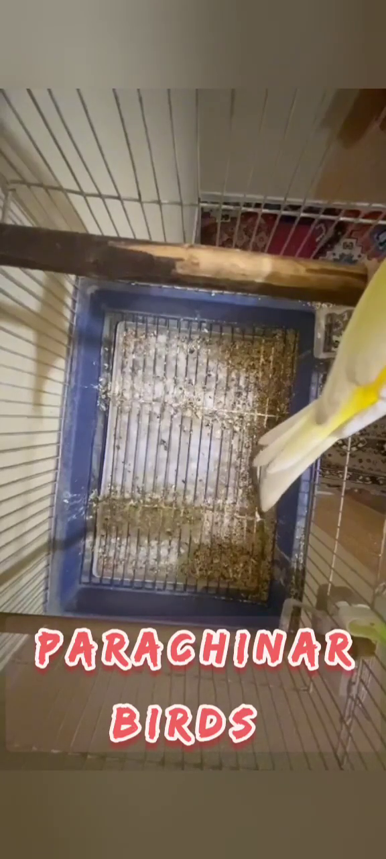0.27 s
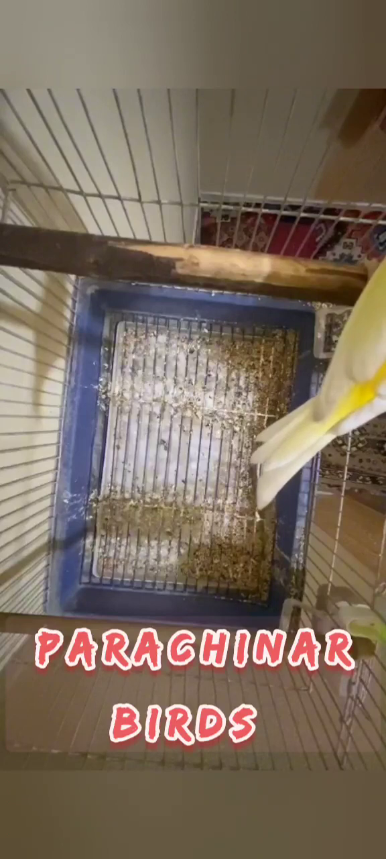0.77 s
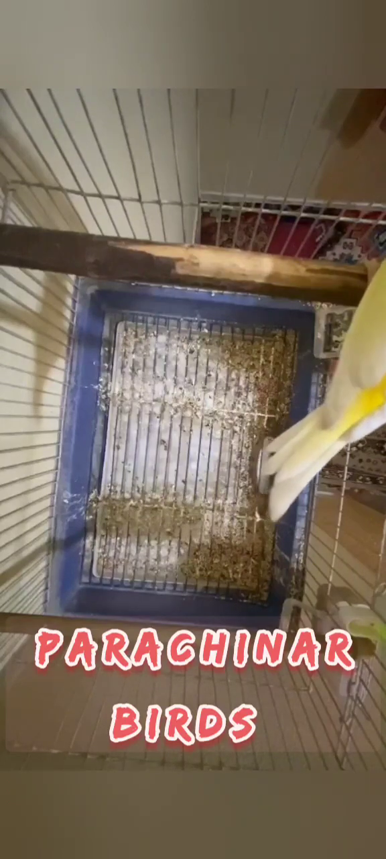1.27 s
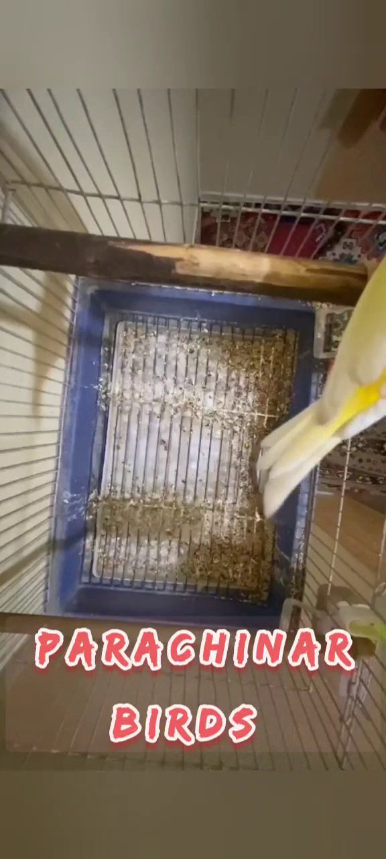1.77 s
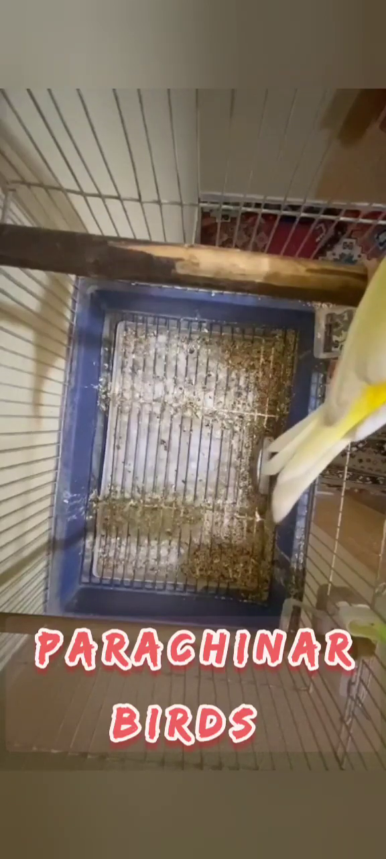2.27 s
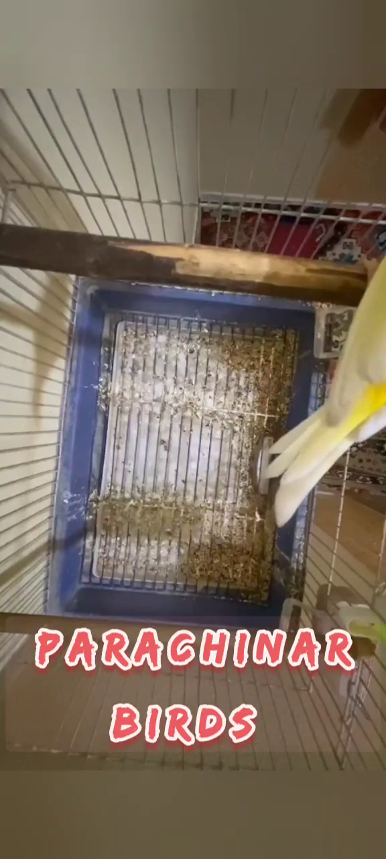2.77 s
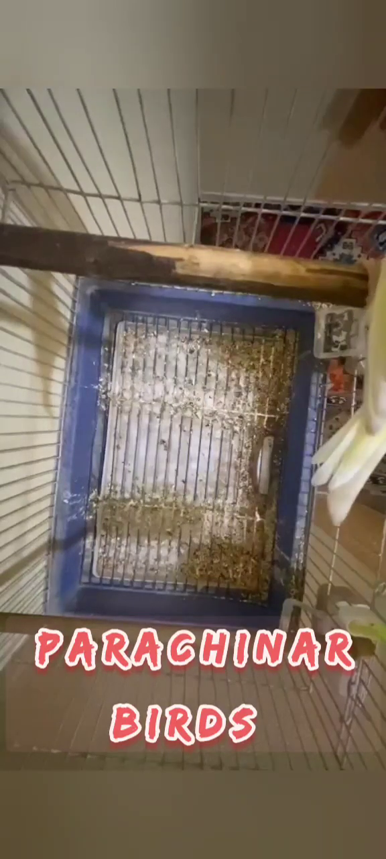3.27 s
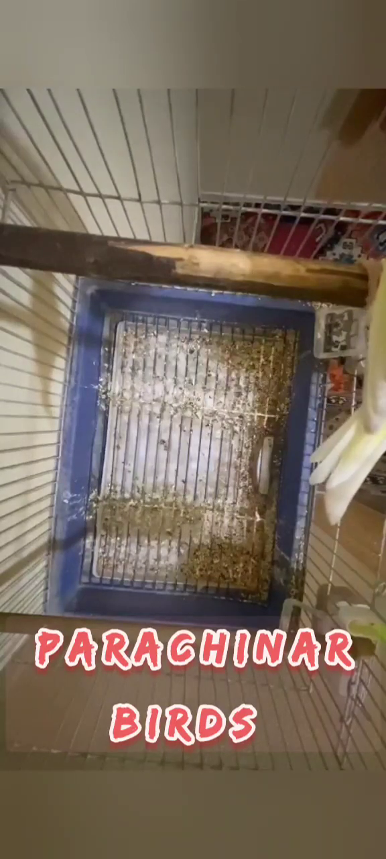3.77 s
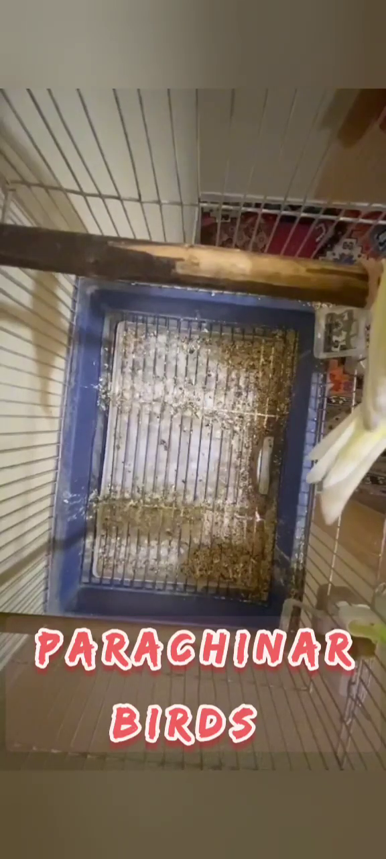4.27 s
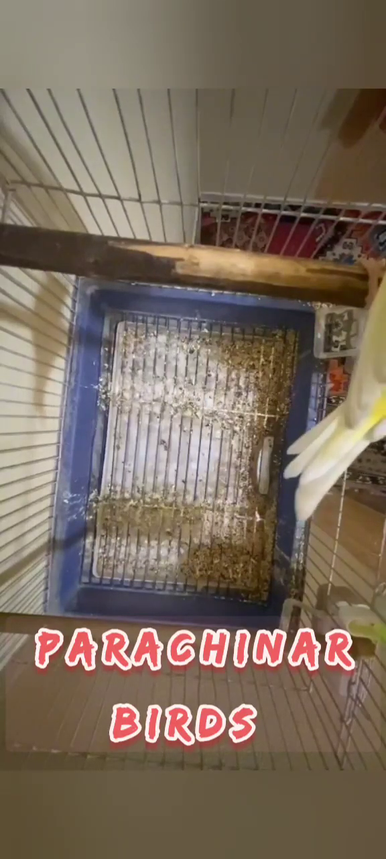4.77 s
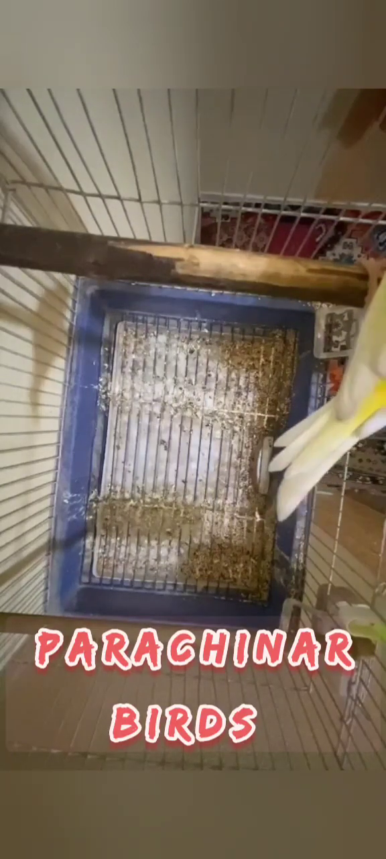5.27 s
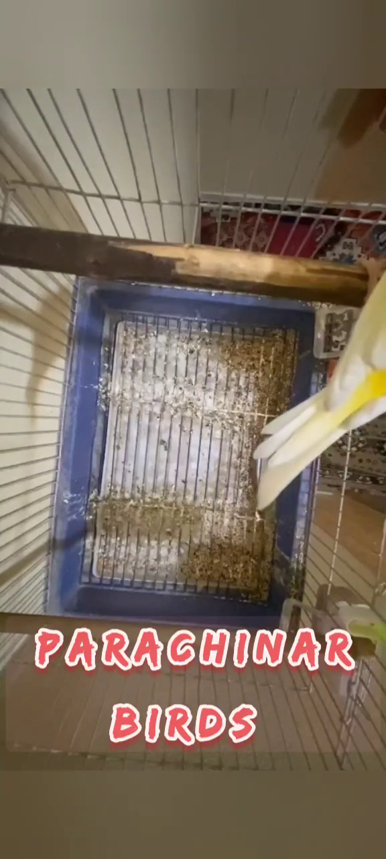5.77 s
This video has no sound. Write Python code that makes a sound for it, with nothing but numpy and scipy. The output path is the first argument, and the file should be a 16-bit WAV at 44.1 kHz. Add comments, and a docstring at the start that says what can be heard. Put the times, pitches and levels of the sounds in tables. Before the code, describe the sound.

A canary sings close to the microphone inside a wire cage in a lively room. From 0 to 1.6 seconds it gives four held whistles around 1100 Hz, the first already under way, each lifting and cracking slightly at the end. Sharp plunging chips with clicks separate them at about 0.34, 0.8 and 1.27. From 1.7 to 2.7 a trill of upward flicks runs at about seventeen beats a second, gaining strength and a nasal murmur. Feathers swish and the perch thuds near 2.7. Song then stops until 4.3, with low hum swelling and fading over a fuzzy drone and faint room air. At 4.3 and 4.9 airy swoops fall into clear tones, breaking into hoarse lower croaks with harsh endings. From 5.4 to 6 a faster trill of about twenty-three beats a second alternates clicking downward snaps and upward flicks. Walls and cage wires ring; slight shuffles recur.

```python
"""A caged canary sings close by: four held whistles with sharp chips between them, a trill,
two falling slurs that break into a hoarse lower octave, and a faster two-part trill.
Held notes are sums of harmonics with half-pitch lines; short ones are quick pitch sweeps and clicks.
Shaped noise makes its shuffles on the perch; walls answer with a fading noise tail, the cage with narrow rings.
A low hum swells and fades under it all, with a noise drone and faint room air."""
import sys
import numpy as np
from scipy import signal
from scipy.fft import rfft, irfft, next_fast_len
from scipy.io import wavfile
from scipy.ndimage import uniform_filter1d, map_coordinates

SR = 44100
rng = np.random.default_rng(int(sys.argv[2]) if len(sys.argv) > 2 else 0)


def put_to_file(sound):
    """Save the sound as 16-bit audio at rate SR, in the file named by the first command-line argument."""
    columns = np.atleast_2d(sound).T  # one column per channel
    safe = np.clip(columns, -1, 1)
    whole_steps = np.round(safe * 32767)
    wavfile.write(sys.argv[1], SR, whole_steps.astype(np.int16))


N = 265173  # length in samples

# The pulses of a click. Each row: delay in seconds, level in dB, random timing spread in seconds.
CLICK_PULSES = [(.001, 0, 0), (.0032, -2, .0004)]
TRILL_SCATTER = .015  # random pitch spread from beat to beat, as a fraction
FLICK_RAD = .2  # phase jitter of the slow trill's flicks and the fast trill's snaps, radians


def amp(db):
    """Decibels to gain."""
    return 10 ** (np.asarray(db) / 20)


def unit(x):
    """Scale to rms 1."""
    return x / np.sqrt(np.mean(x ** 2) + 1e-20)


def along(points, hz):
    """Rows of (Hz, value) read on a log frequency axis."""
    f, v = np.transpose(points)
    return np.interp(np.log(hz + 1), np.log(f + 1), v)


def curves(rows, t):
    """Each column after the time, read at times t."""
    s, *cols = np.transpose(rows)
    return [np.interp(t, s, c) for c in cols]


def wobble(rate, size):
    """A smooth random curve, rate knots a second."""
    knots = rng.standard_normal(int(size * rate / SR) + 4)
    return map_coordinates(knots, [np.arange(size) * rate / SR])


def filtered(x, response):
    """x times a response of frequency."""
    m = next_fast_len(N + SR // 2)
    return irfft(rfft(x, m) * response(np.fft.rfftfreq(m, 1 / SR)), m)[..., :N]


def noise(spectrum):
    """Coloured noise of rms 1."""
    return unit(filtered(rng.standard_normal(N), lambda hz: amp(along(spectrum, hz))))


def add(track, s, sound):
    """Mix a sound into the track from time s on."""
    i = round(s * SR)
    sound = sound[..., max(-i, 0):max(N - i, 0)]
    track[..., max(i, 0):max(i, 0) + sound.shape[-1]] += sound


def sides(db):
    """Left and right gains for a level difference."""
    return unit(amp(np.array([[1], [-1]]) * db / 2))


def step(t, s, width):
    """A smooth rise from 0 to 1 around time s."""
    return .5 + .5 * np.tanh((t - s) / (2 * width))


def fades(t, attack, release):
    """Attack, hold and release over the times t."""
    return np.clip(np.minimum((t - t[0]) / attack, (t[-1] - t) / release), 0, 1)


def smooth_size(x, size):
    """Running rms along the last axis."""
    return np.sqrt(np.abs(uniform_filter1d(np.abs(x) ** 2, size)) + 1e-20)


def syrinx(t, hz, harmonics_db, split, rasp, pan_db, bloom_db, bloom_s, half_lines=None):
    """A held tone; period doubling puts lines between its harmonics, and rasp doubles the period again."""
    # Strength of the upper harmonics. Each row: frequency in Hz, level in dB.
    overtones = [(4000, -14.5), (4600, -20.5), (5500, -14.5), (6600, -18), (7800, -29), (9000, -31),
                 (10200, -45.5), (11500, -52.5)]
    if half_lines is None:
        # Strength of the lines between the harmonics. Each row: frequency in Hz, level in dB.
        half_lines = [(550, -27), (820, -16.5), (1650, -5.5), (2500, -4.5), (2800, 6.5), (4000, -25.5),
                      (5800, -32.5), (7500, -35.5), (10000, -57)]
    pitch_waver, clear_rad = 0.0076, 0.025  # fraction of the pitch; phase jitter in radians
    flicker_db, sway_db = 1.2, 3  # low-harmonic level flicker, left-right sway
    size = len(t)
    phase = 2 * np.pi * np.cumsum(hz * (1 + pitch_waver * wobble(150, size))) / SR
    # the rasp combines a quarter and an eighth of the pitch, both drifting in phase
    rough = .22 * wobble(600, size)
    rough = rough + 1.1 * np.sin(phase / 4 + 1.1 * wobble(45, size))
    rough = rough + .35 * np.sin(phase / 8 + 1.5 * wobble(45, size))
    phase = phase + clear_rad * wobble(700, size) + rasp * rough
    low = [db + flicker_db * wobble(30, size) for db in harmonics_db]
    # the upper harmonics come in only as the pressure builds, and each one wavers
    bloom = bloom_db * np.exp(-(t - t[0]) / bloom_s)
    upper = [harmonics_db[-1] + bloom + along(overtones, k * hz) + 3.6 * wobble(40, size)
             for k in range(4, 11)]
    tone = sum(amp(level) * np.sin(k * phase) for k, level in enumerate(low + upper, 1))
    slip = .65 * wobble(70, size)  # the doubled period keeps losing its lock
    halves = sum(amp(along(half_lines, k * hz) + bloom * (k > 2)) * np.sin(k * phase + slip)
                 for k in np.arange(9) + .5)
    halves *= split * amp(2 * wobble(110, size))
    return sides(pan_db + sway_db * wobble(20.2, size)) * (tone + halves)


def whistles():
    """Each scoops up, then drifts (the first slowly up, the others down), brightens, cracks and lifts."""
    # Each row: start and end in seconds, pitch in Hz, downward drift in Hz per second (negative climbs),
    # closing lift in Hz, level in dB, 2nd harmonic in dB re level, time of the deepest crack in seconds,
    # its rasp depth, left-right in dB.
    whistle_rows = [(-.1, 0.286, 1108, -47.5, 40, -30.5, -6, 0.23, 0.09, 5.5),
                    (0.372, 0.733, 1107, 87.5, 88.4, -35.5, -6, 0.655, 0.24, 0.5),
                    (0.839, 1.194, 1117, 256.5, 105, -36, -8.5, 1.123, 0.083, -1),
                    (1.3, 1.626, 1115, 371, 52.5, -36, -7, 1.569, 0.26, -0.5)]
    scoop_hz, scoop_s, lift_lead_s, lift_s = 215.5, 0.022, .045, .011
    brighten_db, third_db = 3, -46.5  # overtone growth over the whistle, 3rd harmonic level
    crack_loss_db, crack_split_db, crack_s = 4, -42, .033  # lasting loss, half-pitch lines, crack width
    out = np.zeros((2, N))
    for start, end, pitch, drift, lift, db, second_db, crack_at, rasp, pan_db in whistle_rows:
        t = np.arange(start, end, 1 / SR)
        age = t - start
        cracked = np.exp(-((t - crack_at) / crack_s) ** 2)
        hz = pitch - scoop_hz * np.exp(-age / scoop_s) - drift * age
        hz = hz + lift * step(t, end - lift_lead_s, lift_s)
        bright = brighten_db * (age / (end - start) - .5)
        loss = crack_loss_db * step(t, crack_at, crack_s / 2)
        levels = [db - loss, db + second_db + bright, third_db + bright - loss / 2]
        tone = syrinx(t, hz, levels, amp(crack_split_db) * cracked, rasp * cracked, pan_db,
                      bloom_db=-9.5, bloom_s=0.006)
        add(out, start, fades(t, attack=0.0091, release=0.023) * tone)
    return out


def syllables(events, shape, overtone_db, rasp, scatter=0.0051):
    """A quick pitch gesture with jittered phase, a little different in pitch at each (s, dB) event."""
    edge_s = .001  # fade at both ends
    out = np.zeros(N)
    t = np.arange(shape[0][0], shape[-1][0], 1 / SR)
    hz, level = curves(shape, t)
    gate = np.sin(np.pi / 2 * fades(t, edge_s, edge_s)) ** 2
    for s, peak in events:
        cycles = np.cumsum(hz) / SR * (1 + scatter * rng.standard_normal()) + rng.random()
        phase = 2 * np.pi * cycles + rasp * wobble(1100, len(t))
        tone = np.sin(phase)
        for k, db in enumerate(overtone_db, 2):
            tone = tone + amp(db + rng.normal(0, 1.5)) * np.sin(k * phase)
        add(out, s + t[0], amp(peak + level) * gate * tone)
    return out


def snaps(events, pulses):
    """Each (s, dB) click is one or more pulses that ring briefly at slightly scattered pitches."""
    # What a click rings with. Each row: frequency in Hz, level in dB, time to fall 60 dB in seconds.
    modes = [(1450, -2, .007), (1960, -3, .012), (2750, 1, .007), (3500, -3, .005)]
    attack_s, scatter = .00025, .025  # scatter as a fraction of the pitch
    foot_hz = 853  # clicks have little below this
    out, t = np.zeros(N), np.arange(SR // 20) / SR
    for s, db in events:
        for delay, pulse_db, spread in pulses:
            ring = np.zeros(len(t))
            for hz, level, t60 in modes:
                mode_hz = hz * (1 + scatter * rng.standard_normal())
                ring += amp(level - 60 * t / t60) * np.sin(2 * np.pi * mode_hz * t)
            pulse = amp(db + pulse_db) * (1 - np.exp(-t / attack_s)) * ring
            add(out, s + delay + spread * rng.standard_normal(), pulse)
    return filtered(out, lambda hz: hz ** 4 / (hz ** 4 + foot_hz ** 4))


def chips():
    """Each chip plunges in pitch and ends in a click."""
    # Each row: time at the foot of the plunge in seconds, level in dB.
    chip_events = [(.343, -23), (0.811, -24.5), (1.269, -23.5)]
    # The plunge. Each row: seconds from its foot, pitch in Hz, level in dB.
    plunge = [(-.029, 2351, -14.5), (-.02, 2358, -2), (-.012, 2380, -5), (-.007, 2300, -2.5),
              (-.003, 1896, -5.5), (0, 1395, -1.5), (.002, 1230, -14.5), (.0035, 1127, -34)]
    click_lead_s, click_db = 0.0031, -6.5
    clicks = snaps([(s - click_lead_s, db + click_db) for s, db in chip_events], CLICK_PULSES)
    return (syllables(chip_events, plunge, overtone_db=[-20, -40], rasp=0.081) + clicks) * sides(1.0)


def throat(x):
    """The throat's resonance colours the trills."""
    # Each row: frequency in Hz, gain in dB.
    resonance = [(2000, 1), (2700, 2.5), (3200, -4), (3650, -1), (4150, -17), (5200, -12.5)]
    return filtered(x, lambda hz: amp(along(resonance, hz)))


def slow_trill(flick_db=2.0, murmur_db=-20, soft_start_db=-16, swell_s=0.039):
    """Each beat is a sharp upward flick; as the trill gets going, a low nasal murmur leads into it."""
    # Each row: beat time in seconds, level in dB.
    beats = [(1.7276, -42), (1.7845, -37), (1.8404, -36.5), (1.899, -35.5), (1.958, -37), (2.014, -35.5),
             (2.0736, -35.5), (2.1322, -34.5), (2.192, -35), (2.2506, -35.5), (2.3099, -34),
             (2.3668, -32.5), (2.4279, -33.5), (2.4892, -33.5), (2.5483, -32.5), (2.6077, -32.5),
             (2.6683, -33)]
    # The upward flick. Each row: seconds from the beat, pitch in Hz, level in dB.
    flick = [(-.0025, 850, -18), (-.0003, 1030, -2), (.0017, 1330, 3), (.0032, 1600, -2),
             (.0048, 1800, -18)]
    # The murmur before it. Each row: seconds from the beat, pitch in Hz, level in dB.
    murmur = [(-.029, 704.4, -15), (-.022, 692.7, 4), (-.012, 665, 3), (-.003, 622, -0.5)]
    s, db = np.transpose(beats)
    lead_db = db + murmur_db + soft_start_db * np.exp(-(s - s[0]) / swell_s)
    lead_db = lead_db + rng.normal(0, 2, len(s))  # uneven from beat to beat, dB
    flicks = syllables(zip(s, db + flick_db), flick, overtone_db=[-8.5, -16.5, -21, -39],
                       rasp=FLICK_RAD, scatter=TRILL_SCATTER)
    murmurs = syllables(zip(s, lead_db), murmur, overtone_db=[3, -8, -3], rasp=.12, scatter=TRILL_SCATTER)
    return throat(flicks + murmurs) * sides(1.3)


def slurs():
    """A steep swoop with a rush of air runs into a clear tone that falls ever more slowly and swells."""
    # Each row: start and end in seconds, swoop level in dB, tone level in dB, left-right in dB.
    slur_rows = [(4.323, 4.564, -39.5, -41.5, 2.5), (4.907, 5.129, -37, -40, -1)]
    # The opening swoop. Each row: seconds from the start, pitch in Hz, level in dB.
    swoop = [(-.006, 3326, -26), (.002, 3177, -4), (.009, 2810, 13), (0.013, 2444, 7.5), (0.02, 2200, 1.5),
             (.027, 2010, -6.5), (.033, 2010, -42)]
    # The rush of air. Each row: frequency in Hz, level in dB.
    air_rush = [(1500, -25), (4300, -7.5), (5800, 3), (7000, -10), (10000, -27)]
    # First three harmonics of the tone, in dB re its level.
    harmonics = [1.5, -12.5, -28]
    hiss_db, hiss_delay_s, hiss_decay_s = -55, 0.01, 0.032
    swoop_s, rest_hz, fall_hz, fall_s = .023, 1611, 416, .088
    swell_db_per_s, edge_s = 25, .009
    swoop_events = [(start, db) for start, _, db, _, _ in slur_rows]
    out = syllables(swoop_events, swoop, overtone_db=[-25, -44], rasp=.09) * sides(0.93)
    hiss = noise(air_rush)
    for start, *_ in slur_rows:
        age = np.arange(N) / SR - start - hiss_delay_s
        out += amp(hiss_db) * hiss * np.exp(-np.maximum(age, 0) / hiss_decay_s) * step(age, 0, edge_s / 2)
    for start, end, _, db, pan_db in slur_rows:
        t = np.arange(start + swoop_s, end, 1 / SR)
        hz = rest_hz + fall_hz * np.exp(-(t - t[0]) / fall_s)
        levels = [db + h + swell_db_per_s * (t - t.mean()) for h in harmonics]
        tone = syrinx(t, hz, levels, 0, 0, pan_db, bloom_db=-12.0, bloom_s=.06)
        add(out, t[0], fades(t, edge_s, edge_s) * tone)
    return out


def croaks():
    """With its period doubled throughout, the voice arches up and down an octave lower and ends harsh."""
    # One curve for each croak. Each row: time in seconds, lower-octave pitch in Hz, level in dB.
    croak_curves = [
        [(4.57, 787, -60), (4.59, 782, -47.5), (4.625, 765, -49), (4.66, 833, -42), (4.7, 833.5, -42),
         (4.741, 808.5, -40), (4.762, 731, -49), (4.79, 705, -71)],
        [(5.12, 691, -52), (5.14, 708, -48), (5.163, 825.6, -46.5), (5.205, 837, -41.5), (5.24, 891.5, -44.5),
         (5.275, 823, -46), (5.298, 784, -45.5), (5.322, 711, -58)],
    ]
    # When each croak turns harsh, in seconds.
    harsh_times = [4.757, 5.218]
    # First three harmonics of the undoubled voice, in dB re the croak's level.
    harmonics = [-2.5, -4, -20.5]
    # Strength of the lines halfway between them. Each row: frequency in Hz, level in dB.
    croak_halves = [(700, -6), (850, -6.5), (1950, -18.5), (2280, -9), (2480, -3), (2800, 0.5),
                    (4150, -17.5), (5800, -28), (7500, -30.5), (10000, -57)]
    dull_db, open_s = -14.5, 0.044  # the overtones open up after the start
    halves_db, edge_s, pitch_waver = 5, 0.0039, .007  # waver as a fraction of the pitch
    harsh_depth, harsh_rise_s = .65, .006
    out = np.zeros((2, N))
    for rows, harsh_s in zip(croak_curves, harsh_times):
        t = np.arange(rows[0][0], rows[-1][0], 1 / SR)
        hz, level = curves(rows, t)
        dull = dull_db * np.exp(-(t - t[0]) / open_s)
        levels = [level + h + dull * (k > 0) for k, h in enumerate(harmonics)]
        rasp = harsh_depth * step(t, harsh_s, harsh_rise_s)
        hz = hz * (1 + pitch_waver * wobble(45, len(t)))
        tone = syrinx(t, 2 * hz, levels, amp(level + halves_db), rasp, 0,
                      bloom_db=-36, bloom_s=0.049, half_lines=croak_halves)
        add(out, t[0], fades(t, edge_s, edge_s) * tone)
    return out


def fast_trill(snap_db=-5, click_db=2.0, flick_db=-2):
    """Each beat is a click, a steep bright snap downwards and then an upward flick."""
    # Each row: beat time in seconds, level in dB.
    beats = [(5.4163, -42), (5.4582, -38.5), (5.5004, -40), (5.5438, -37), (5.5883, -35.5), (5.6318, -35.5),
             (5.6784, -35), (5.7217, -35.5), (5.7668, -34), (5.8133, -37), (5.8567, -34), (5.9034, -35),
             (5.9474, -35), (5.992, -35)]
    # The downward snap. Each row: seconds from the beat, pitch in Hz, level in dB.
    snap = [(.0002, 1850, -3), (.0015, 1550, 0), (.003, 1340, -1), (.0048, 1220, -14)]
    # The upward flick. Each row: seconds from the flick's time, pitch in Hz, level in dB.
    flick = [(-.001, 880, -16), (.0012, 1060, -2), (.003, 1350, 0), (.005, 1700, -14)]
    flick_delay_s = .032  # a flick follows each snap
    s, db = np.transpose(beats)
    clicks = snaps(zip(s, db + click_db), CLICK_PULSES[:1])
    down = syllables(zip(s, db + snap_db), snap, overtone_db=[4, -14], rasp=FLICK_RAD, scatter=TRILL_SCATTER)
    up = syllables(zip(s + flick_delay_s, db + flick_db), flick, overtone_db=[-7, -13, -28],
                   rasp=.1, scatter=TRILL_SCATTER)
    return throat(clicks + down + up) * sides(0.98)


def shuffles(swish_life=0.26):
    """Feathers swish briefly and the perch jolts the cage as the bird shifts its feet: fading noise."""
    # Each row: time in seconds, feather swish, cage knock and thud in dB,
    # seconds for knock and thud to fall 30 dB.
    shuffle_rows = [(0.264, -61.5, -57.5, -88, 0.22), (1.15, -69.5, -51, -93, 0.59),
                    (1.56, -74, -44.5, -70, 0.68), (2.667, -56, -58, -88, 0.57),
                    (2.768, -56, -52.5, -47, 0.35), (4.049, -79, -96, -90, 0.075),
                    (5.744, -61.5, -60.5, -88.5, 0.84), (5.957, -66.5, -92, -82, 1)]
    # Feather swish spectrum. Each row: frequency in Hz, level in dB.
    feathers = [(1000, -25.5), (3000, -12), (5500, -3.5), (7500, -7), (9500, -14.5), (11500, -40.5)]
    # Cage knock spectrum. Each row: frequency in Hz, level in dB.
    knock = [(90, -30), (160, 0), (240, 6), (400, -6.5), (600, -6.5), (1000, -18), (2000, -22),
             (4000, -62.5)]
    # Thud spectrum. Each row: frequency in Hz, level in dB.
    thud = [(25, -27), (55, 2.5), (90, -16), (200, -26), (500, -65)]
    rise_s = .02
    t, out = np.arange(N) / SR, np.zeros(N)
    flutter, rattle = amp(2.5 * wobble(120, N)), amp(2.5 * wobble(50, N))
    layers = np.array([noise(feathers) * flutter, noise(knock) * rattle, noise(thud)])
    life = np.array([[swish_life], [1], [1]])  # the swish dies sooner
    for s, *levels, fade in shuffle_rows:
        rise = np.clip((t - s) / rise_s + 1, 0, 1)
        swell = rise * amp(-30 * np.maximum(t - s, 0) / (fade * life))
        out += amp(levels) @ (swell * layers)
    return np.array([out, out])


def cage_ring(x, spread=0.18):
    """The cage wires ring on at narrow pitches, each reaching the two sides out of step."""
    # Each row: frequency in Hz, width in Hz, level in dB.
    rings = [(639, 9.7, -3.5), (758, 6, -12), (950, 11, -2.5), (1103, 4.7, -10.5), (1258, 14, -6.5),
             (1394, 2.9, -5), (1730, 12, -7), (1799, 15, 11.5), (1860, 11, 9.5), (1973, 9.8, 15),
             (2190, 5.3, -5.5), (2449, 10, -0.5), (2772, 120, -6), (3360, 18, -6)]
    turns = spread * rng.choice([-1, 1], len(rings))  # radians, opposite on the two sides

    def response(f):
        total = 0
        for (hz, width, db), turn in zip(rings, turns):
            resonance = 1j * f * width / (hz * hz - f * f + 1j * f * width)
            total = total + amp(db) * np.exp(1j * turn * np.array([[1], [-1]])) * resonance
        return total

    return filtered(x.mean(axis=0), response)


def room(x, wet_db, apart=1):
    """Direct sound reaches two microphone ports out of step; the walls answer with a wide, fading tail."""
    # Decay of the room. Each row: frequency in Hz, time to fall 60 dB in seconds.
    decay_times = [(200, 0.67), (750, 0.85), (1600, 0.69), (2500, 0.66), (6000, 0.43), (11000, 0.014)]
    # The beak points away, so its treble arrives mostly by the walls.
    # Each row: frequency in Hz, gain of the direct sound in dB.
    beak = [(3000, -1.5), (4500, -5.5), (8000, -7)]
    # Phase by which the left port leads the right. Each row: frequency in Hz, lead in radians at apart=1.
    port_lead = [(400, .4), (750, 2.22), (1100, 1.94), (1480, 1.97), (1780, 1.1), (2100, 2.28),
                 (2550, 2.84), (3080, 2.9), (3500, .6), (4300, 2.2), (4900, .1)]
    hz, t, z = signal.stft(rng.standard_normal((2, SR * 3 // 4)), SR, nperseg=256)
    tail = signal.istft(z * amp(-60 * t / along(decay_times, hz)[:, None]), SR, nperseg=256)[1]
    age = np.arange(tail.shape[1]) / SR
    tail *= np.clip(age / 0.0031, 0, 1) * (1 + 6 * np.exp(-age / 0.042))  # near walls answer first
    # even out the tail's peaks and dips, keeping its decay, so held notes stay steady
    colour, decay = smooth_size(rfft(tail), size=600), smooth_size(tail, size=600)
    for _ in range(6):
        tail = irfft(colour * np.exp(1j * np.angle(rfft(tail))), len(age))
        tail *= decay / smooth_size(tail, size=600)
    wet = signal.fftconvolve(x, tail / np.linalg.norm(tail[0]), axes=1)[:, :N]
    lead = np.array([[.5], [-.5]]) * apart
    direct = filtered(x, lambda f: amp(along(beak, f)) * np.exp(1j * lead * along(port_lead, f)))
    return direct + amp(wet_db) * wet


def background():
    """A swelling low sine hum, a fuzzier noise drone above it, and the still air of the room."""
    # Each row: time in seconds, centre of the hum's wavering level in dB.
    hum_level = [(0.0, -59), (0.06, -45), (0.5, -40), (0.9, -51), (1.39, -36), (1.69, -39.5), (2.13, -54.5),
                 (2.26, -47.5), (3.0, -48), (3.05, -67), (3.21, -43.5), (3.36, -55.5), (3.58, -40.5),
                 (4.03, -56), (4.42, -43), (4.62, -57.5), (4.77, -51.5), (6.01, -59.5)]
    # Each row: time in seconds, pitch of the hum in Hz.
    hum_pitch = [(1.8, 104.3), (3.0, 101), (3.3, 100.1), (6.0, 101)]
    # Spectrum of the air. Each row: frequency in Hz, level in dB.
    air_spectrum = [(20, -21.5), (45, 2.5), (85, 7.5), (170, 0.5), (240, -7), (330, -15.5), (400, -29),
                    (520, -21.5), (750, -39.5), (1400, -35), (3000, -44), (6500, -47.5), (10000, -51.5),
                    (12000, -56)]
    hum_waver_db, drone_db, drone_waver_db, air_db = 2, -58.5, 4, -69.5
    t = np.arange(N) / SR
    (level,), (hz,) = curves(hum_level, t), curves(hum_pitch, t)
    hum = amp(level + hum_waver_db * wobble(9, N)) * unit(np.sin(2 * np.pi * np.cumsum(hz) / SR))
    fuzz = noise([(120, -24), (148, -7.0), (159, -1.0), (170, -25.0), (200, -35.0), (400, -88)])
    drone = amp(drone_db + drone_waver_db * wobble(3.2, N)) * fuzz
    air = np.array([noise(air_spectrum), noise(air_spectrum)])
    air *= amp(air_db) / np.std(filtered(air, lambda f: f > 200))  # level set above 200 Hz
    # the bass is nearly the same on both sides, the treble is not
    side = filtered(air[1], lambda f: amp(along([(150, -30.5), (300, 1.0), (700, 2.0)], f)))
    return hum + drone + air[0] + np.array([side, -side])


def scene(chip_ring_db=-5, jolt_ring_db=-4, slow_ring_db=-2, fast_ring_db=2):
    """The bird in its room, over the hum; its short sounds and its feet set the cage ringing."""
    chip, slow, fast, jolts = chips(), slow_trill(), fast_trill(), shuffles()
    held = room(whistles() + slurs() + croaks(), wet_db=-9)
    short = room(chip, wet_db=-6.5) + room(fast, wet_db=-5.0) + room(slow, wet_db=-8.5)
    feet = room(jolts, wet_db=-12.0, apart=0.25)
    struck = amp(slow_ring_db) * slow + amp(fast_ring_db) * fast
    struck = struck + amp(chip_ring_db) * chip + amp(jolt_ring_db) * jolts
    return held + short + feet + cage_ring(struck) + background()


def record(dry):
    """The microphone's response dips in two places; nothing is kept above the band limit."""
    # Each row: frequency in Hz, gain in dB.
    mic_response = [(3200, -1), (3750, -4.5), (4400, 2), (7200, 3.5), (8300, -8.5), (9300, -0.5)]
    top_hz = 11700
    return filtered(dry, lambda hz: amp(along(mic_response, hz)) * (hz < top_hz))


dry = scene()
out = record(dry)
put_to_file(out)
```